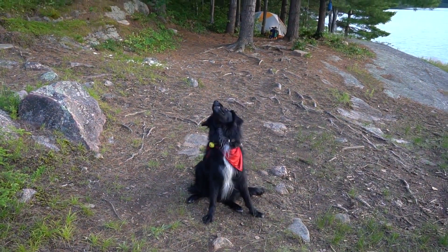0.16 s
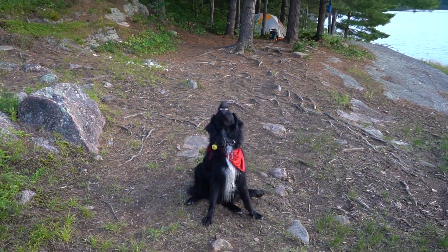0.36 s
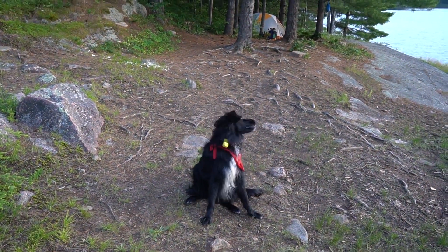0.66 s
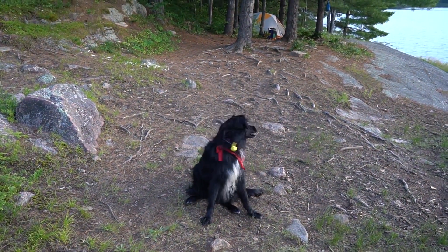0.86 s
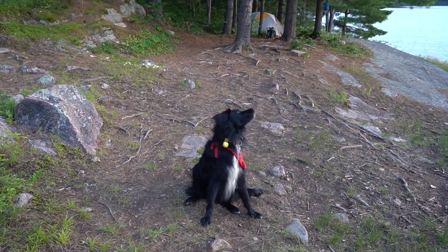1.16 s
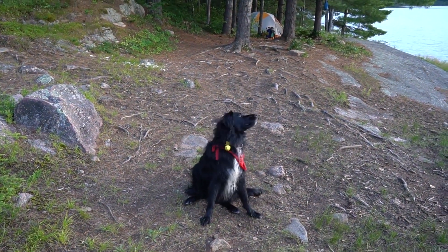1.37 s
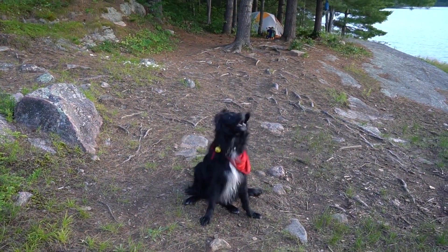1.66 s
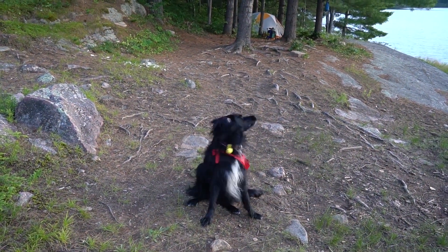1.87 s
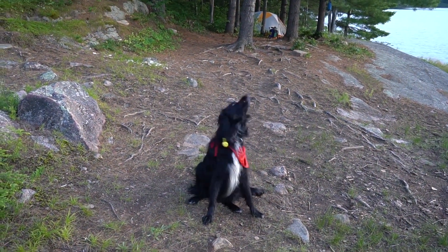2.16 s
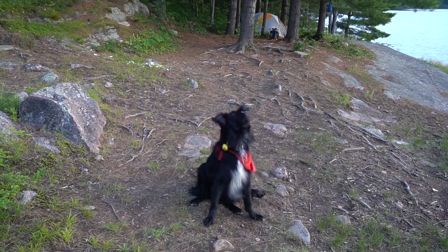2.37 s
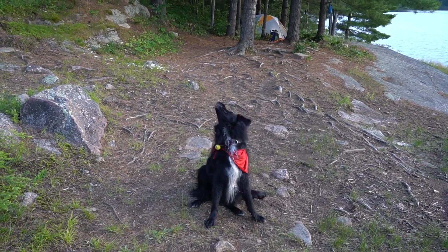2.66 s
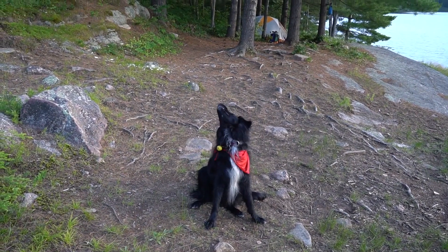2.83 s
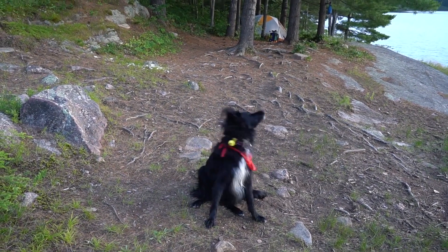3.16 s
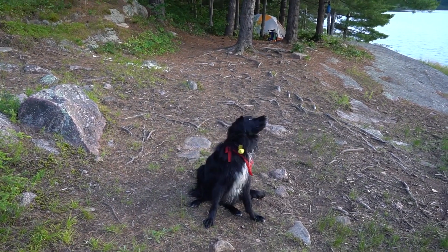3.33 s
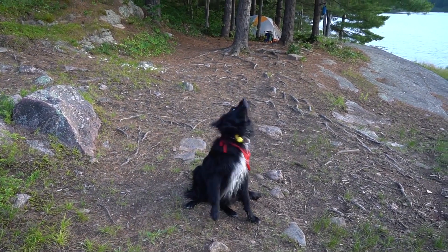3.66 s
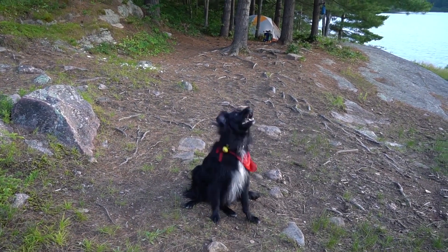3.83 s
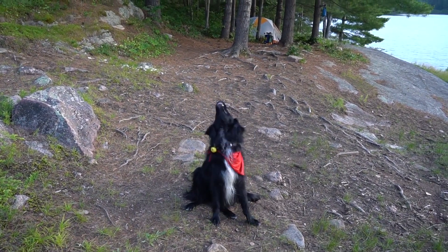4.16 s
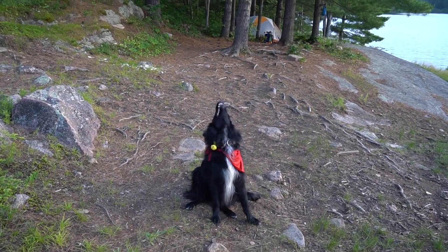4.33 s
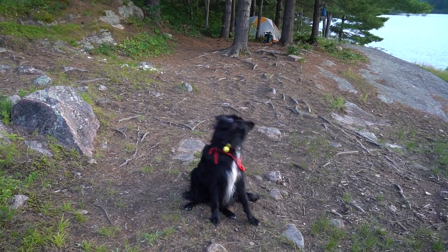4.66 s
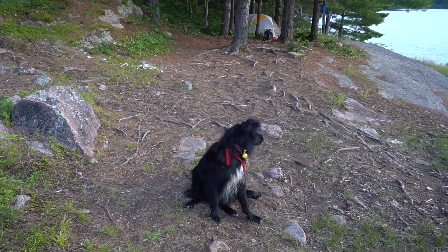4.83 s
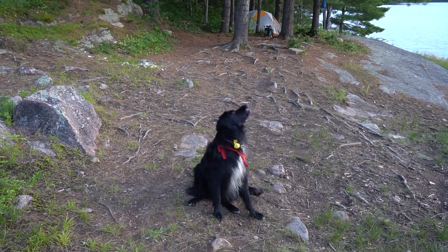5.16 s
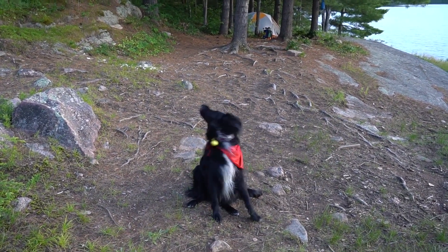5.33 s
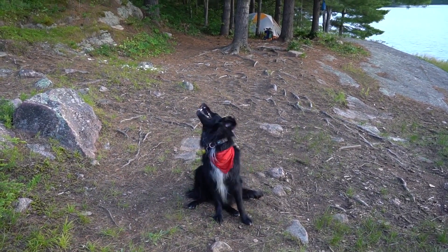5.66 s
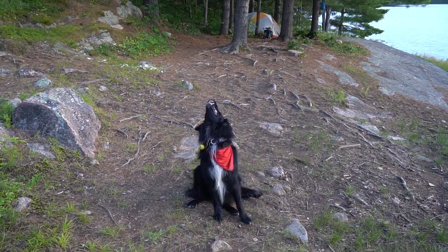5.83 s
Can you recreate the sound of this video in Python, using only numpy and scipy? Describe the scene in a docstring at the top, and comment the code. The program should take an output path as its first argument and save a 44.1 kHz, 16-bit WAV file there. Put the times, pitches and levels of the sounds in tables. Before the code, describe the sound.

Outdoors among trees by water, a dog tosses its head and its collar bell tinkles sharply, each toss a quick clatter of tiny metallic hits that die almost at once. Brief gaps leave only faint air and low rumble. A clear snap of teeth with a dull thud comes before the strongest rings; later jingles are more scattered, ending in a fresh flurry. Nearby dry stereo microphones, slight woodland tail.

```python
"""A small metal jingle bell on a dog's collar, close to a stereo pair of microphones at a lakeside campsite.
The dog tosses its head, snapping at the air: each toss sets a loose pellet tumbling in the bell, and square
hits stand out. Each contact rings decaying sine modes of shell and cavity, with a short noise skid.
Around it: jaw snaps (clicks, mouth tones, thuds), noise brushes of fur and bandana, gliding sine chips of
a small bird, two thin whistles far off, a scattered tail, and a low noise rumble with a faint breeze."""
import sys
import numpy as np
from scipy import signal
from scipy.fft import rfft, irfft, next_fast_len
from scipy.io import wavfile
from scipy.ndimage import uniform_filter1d, minimum_filter1d, map_coordinates

SR = 44100
rng = np.random.default_rng(int(sys.argv[2]) if len(sys.argv) > 2 else 0)


def store_pcm(level_fs):
    """Save levels as 16-bit WAV."""
    pcm = np.round(np.clip(level_fs, -1, 1) * 32767).astype(np.int16)
    wavfile.write(sys.argv[1], SR, np.atleast_2d(pcm).T)


N = 264159  # length [samples]
TOP_HZ = 15800  # upper band limit
SOUND_SPEED = 343  # m/s

# Levels in the tables are relative: the functions add their own offsets.
# Square hits of the pellet: (time [s], ring [dB], brightness, 11 over 8.5 kHz drive [dB])
STRIKES = [(0.06, -19.5, 2.5), (0.088, -13, 3.5), (0.14, -20.5, -4), (0.228, -27, 0), (0.26, -21, 0),
           (0.481, -42.5, -18.5), (0.572, -27, -0.5), (0.59, -21.5, 4), (0.629, -27.5, 1),
           (0.673, -26.5, 4.5), (0.774, -27.5, 1), (1.098, -26, -5.5), (1.15, -23.5, -2), (1.572, -18, 6.5),
           (1.703, -17.5, -7), (1.823, -18.5, 0), (1.929, -15.5, 2), (2.016, -28.5, -5.5),
           (2.154, -17.5, 0.5), (2.26, -24.5, 5), (2.484, -18.5, -1), (2.527, -10.5, 6), (2.676, -16, 11),
           (2.728, -19, 3), (2.766, -19.5, 1.5), (2.806, -18, 6.5), (2.877, -21, 7.5), (3.202, -23, -2.5),
           (3.471, -13.5, -5.5), (3.529, -23.5, -4.5), (3.964, -23, -6), (3.994, -17.5, -3.5),
           (4.068, -19.5, -3), (4.096, -21.5, -1.5), (4.13, -12.5, 0), (4.191, -24.5, 6.5),
           (4.402, -36, -7), (4.901, -36.5, -4), (5.262, -32, -13.5), (5.536, -23, 7.5), (5.626, -25, 6.5),
           (5.756, -22.5, 9), (5.79, -20.5, 9.5)]
# Head tosses that keep the pellet tumbling: (start [s], end [s], clatter [dB])
TOSSES = [(0.008, 0.141, -41), (0.227, 0.323, -40), (0.571, 0.71, -42.5), (0.878, 0.9, -57.5),
          (1.011, 1.044, -48), (1.217, 1.239, -44.5), (1.375, 1.409, -44.5), (1.496, 1.52, -37.5),
          (1.806, 1.867, -35.5), (1.912, 1.966, -38), (1.994, 2.04, -36.5), (2.121, 2.21, -32.5),
          (2.259, 2.298, -36.5), (2.408, 2.497, -40), (2.518, 2.593, -32.5), (2.874, 2.972, -43.5),
          (3.306, 3.351, -41), (3.386, 3.443, -40), (3.62, 3.681, -44), (3.73, 3.77, -44),
          (3.853, 3.933, -41.5), (3.964, 4.163, -38), (4.244, 4.423, -51), (4.846, 4.942, -47),
          (5.358, 5.413, -53.5), (5.54, 5.659, -40.5), (5.715, 5.855, -38.5)]
# How freely the bell hangs clear of the fur, which mutes its lowest hum: (time [s], hum [dB])
HANGING_FREE = [(0.03, 10.5), (.08, -8), (.27, 9), (.6, -1), (1.17, 3), (1.5, 0), (2.15, 2), (2.4, -4),
                (2.85, 5.5), (3.22, 6), (3.4, -2), (3.95, -0.5), (5.55, -2), (5.64, 15.5), (5.8, 2)]
# Ringing modes of the slotted shell, many in close pairs: (frequency [Hz], level [dB])
SHELL_MODES = [(1671, -12), (1773, -6), (4304, -21), (4435, -14), (4517, -18), (4592, -18), (6944, -12),
               (7789, -4), (7892, -7), (9142, -2), (9755, -14), (11056, -5), (11267, -6), (12011, -1)]
# Decay of the shell before fur mutes it: (frequency [Hz], time to fall 60 dB [s])
SHELL_DECAY = [(1700, 0.22), (4400, 0.17), (8000, 0.12), (12000, 0.089)]
# Nominal resonances of cavity and slot rims, varied at each contact:
# (frequency [Hz], level [dB], time to fall 60 dB [s])
CAVITY_MODES = [(2532, 16, 0.0042), (6975, 6.5, 0.0032), (7020, -8.5, 0.0063), (8950, -4.5, 0.026),
                (10910, -4.5, 0.0076), (14500, -17, 0.011)]
# Spectrum of the pellet skidding on the wall: (frequency [Hz], relative level [dB per Hz])
SKID_SPECTRUM = [(1200, -25.5), (2500, 0.5), (5200, -9), (7500, -7.5), (11500, -18), (13500, -12),
                 (15500, -14)]
# Bell level across the two microphones: (frequency [Hz], left over right [dB])
BELL_BALANCE = [(2500, -1.5), (4450, 2.5), (7800, 2.3), (12000, -1)]
# Bell phase across the two microphones: (frequency [Hz], left lead [rad])
BELL_LEAD = [(1750, 0.029), (2600, -0.32), (4450, 0.67), (7500, -0.73), (9500, -0.13)]
# Jaw snaps: (time [s], level [dB], mouth resonance [Hz], tooth click [dB])
SNAPS = [(1.689, -30.5, 953, -33), (1.696, -27, 723, -34), (2.3027, -15, 480.3, -16.5),
         (3.232, -31.5, 845, -66), (4.784, -35, 1178, -20)]
# Fur and bandana brushes: (time [s], level [dB], width of the Gaussian swell [s])
BRUSHES = [(1.29, -43, 0.0031), (3.817, -35, 0.0063)]
# Bird chips: (time [s], level [dB])
CHIPS = [(1.1, -39), (2.357, -41.5), (3.717, -42), (4.652, -47), (5.758, -39)]
# Nominal pitch within a chip, varied from chip to chip: (time [s], pitch [Hz])
CHIP_GLIDE = [(0, 9700), (.016, 5480), (.027, 3500)]
# Faint far whistles: (time [s], length [s], start pitch [Hz], end pitch [Hz], level [dB])
WHISTLES = [(1.24, .06, 3350, 3250, -54), (5.403, .11, 3030, 2484, -56)]
# Outdoor air over time: (time [s], rumble [dB], breeze [dB])
AIR_LEVELS = [(0, -56, -52.5), (2.25, -56, -52.5), (2.7, -60.5, -58), (3.8, -61, -52.5),
              (4.399, -61, -57.5)]
# Spectrum of the rumble: (frequency [Hz], relative level [dB per Hz])
RUMBLE_SPECTRUM = [(25, -16), (70, 0.5), (130, -2.5), (300, -11.5), (800, -48)]
# Spectrum of the breeze: (frequency [Hz], relative level [dB per Hz])
BREEZE_SPECTRUM = [(150, -8), (450, -3.5), (1200, -7.5), (2500, -13), (5000, -19.5), (12000, -21.5),
                   (15500, -36)]
# Likeness of the two microphones in noise: (frequency [Hz], correlation [0 to 1])
STEREO_LIKENESS = [(60, 0.97), (160, 0.76), (600, 0.14), (5000, 0.57)]
# Tail scattered by rocks and trunks: (frequency [Hz], time to fall 60 dB [s])
WOODS_DECAY = [(1000, 0.73), (12000, 0.22)]


def bell(hum_db=-3.0, middle_db=-1, ring_db=1.66, shift_hz=135, mute_db_per_s=30, flutter_db=1.33,
         damping_spread=0.56):
    """Every contact rings the shell and the cavity; the pellet's place retunes and damps the cavity."""
    t = np.arange(SR // 4) / SR
    cavity_t = t[:len(t) // 10]
    shell_hz, shell_db = np.transpose(SHELL_MODES)
    shell_rings = ringing(shell_hz, along(SHELL_DECAY, shell_hz), t)
    high = shell_hz > 6000
    cavity_hz, cavity_db, cavity_t60 = np.transpose(CAVITY_MODES)
    shell, cavity = np.zeros((2, N)), np.zeros(N)  # shell rows: low modes, high modes
    contacts = [*strikes(), *tumbling()]
    for s, ring, bright, clack in contacts:
        hum = (clack + ring) / 2 + hum_db + np.interp(s, *np.transpose(HANGING_FREE))
        # a soft, dull contact favours the middle modes, a hard one the highest
        dull, sharp = ring - bright / 2, ring + bright / 2
        blow = [(1800, hum), (2500, clack), (4200, dull + middle_db), (8500, dull), (11000, sharp)]
        shift, damping = rng.standard_normal((2, len(CAVITY_MODES)))
        retuned_hz = cavity_hz + shift_hz * shift
        damped_t60 = cavity_t60 * np.exp(damping_spread * damping)
        cavity_rings = ringing(retuned_hz, damped_t60, cavity_t)
        # fur touching the shell cuts some rings shorter than others
        muted = amp(-mute_db_per_s * rng.exponential() * t)
        strengths = struck(shell_db + along(blow, shell_hz))
        add(shell, s, (strengths * [~high, high]) @ shell_rings * muted)
        add(cavity, s, struck(cavity_db + along(blow, cavity_hz)) @ cavity_rings)
    # the pellet grazing the wall makes the high modes flutter, while the low ones ring on smoothly
    flutter = amp(flutter_db * wobble(600))
    return amp(ring_db) * (shell[0] + flutter * shell[1]) + cavity + skids(contacts)


def strikes(clack_db=-38, clack_grows=.38, typical_db=-22, hop_s=.012, hop_ring_db=-13, hop_clack_db=-2,
            loss_db=4, count=4):
    """A square hit rings and clacks more the harder it is; the pellet then hops, on average ever more lightly."""
    s, ring, bright = np.transpose(STRIKES)
    clack = clack_db + clack_grows * (ring - typical_db)
    contacts = list(zip(s, ring, bright, clack))
    for hop in range(count):
        late, force = rng.standard_normal((len(s), 2)).T
        s = s + hop_s * np.exp(.4 * late)
        db = 2.2 * force - loss_db * hop
        contacts += zip(s, ring + hop_ring_db + db, bright, clack + hop_clack_db + db)
    return contacts


def tumbling(gap_s=.0095, uneven=.6, scatter_db=4.0, fade_db_per_s=20,
             settle_s=.06, settle_db=-9, settle_db_per_s=170,
             clack_db=3, ring_db=-1.0, bright_db=-3, ring_grows=0.27, typical_db=-42,
             first_clack_db=6, first_ring_db=-36, first_grows=0.73, first_bright_db=-4):
    """A toss throws the pellet on the wall with a soft chink; uneven small contacts follow, then it settles."""
    contacts = []
    for start, end, db in TOSSES:
        gaps = gap_s * np.exp(uneven * rng.uniform(-2, 1, size=100))
        times = start + np.cumsum(gaps)
        scatter = scatter_db * np.clip(rng.standard_normal(len(times)), -2, 2)
        force = scatter - fade_db_per_s * (times - start)
        during = times <= max(end, times[0])
        settling = np.where(during, 0, settle_db - settle_db_per_s * (times - end))
        mean_force_db = 10 * np.log10(np.mean(amp(force[during]) ** 2))
        levels = db + force - mean_force_db + settling
        livelier = db - typical_db
        first_ring = first_ring_db + first_grows * livelier
        contacts.append((start, first_ring, first_bright_db, db + first_clack_db))
        # a gentle toss mostly clacks, a lively one also rings
        ring = ring_db + ring_grows * livelier
        for s, level in zip(times, levels):
            if s < end + settle_s:
                contacts.append((s, level + ring, bright_db, level + clack_db))
    return contacts


def struck(db, spot_db=5):
    """Mode strengths for one contact: the spot it meets shares out its energy among them."""
    sign = rng.choice([-1, 1], len(db))
    spot = sign * amp(spot_db * rng.standard_normal(len(db)))
    mean_power = np.average(spot ** 2, weights=amp(db) ** 2)
    return spot * amp(db) / np.sqrt(mean_power)


def ringing(hz, t60, t, contact=.0004):
    """One fading sine per mode; the pellet's contact time [s] softens the onset."""
    sines = np.sin(2 * np.pi * hz[:, None] * t)
    return sines * amp(-60 * t / t60[:, None]) * (1 - np.exp(-t / contact))


def skids(contacts, skid_db=-6, ring_share=0.23, skid_t60=0.032):
    """At each contact the pellet scrapes briefly along the wall: noise bursts that add in power."""
    t = np.arange(SR // 20) / SR
    power = np.zeros(N)
    for s, ring, bright, clack in contacts:
        level = skid_db + clack + ring_share * (ring - clack)
        add(power, s, amp(level - 60 * t / skid_t60) ** 2)
    scrape = filtered(rng.standard_normal(N), lambda hz: amp(along(SKID_SPECTRUM, hz)))
    return np.sqrt(power) * unit(scrape)


def swinging(x, sway_m=.018, sway_rate=13, turn_m=.0007, beam_db=.7):
    """The bell swings on the collar: Doppler bends its pitch; path and level differ a little per microphone."""
    path = sway_m * wobble(sway_rate)
    channels = []
    for delay in [(path + turn_m * wobble(28)) * SR / SOUND_SPEED for _ in range(2)]:
        moved = map_coordinates(x, [np.arange(N) - delay], order=5)
        channels.append(moved * amp(beam_db * wobble(7.45)))
    return np.array(channels)


def placed(pair):
    """Each partial of the bell reaches the two microphones with its own level and phase."""
    half = np.array([[.5], [-.5]])  # left, right

    def response(hz):
        return amp(half * along(BELL_BALANCE, hz)) * np.exp(1j * half * along(BELL_LEAD, hz))

    return filtered(pair, response)


def jaws(swell=0.0019, click_t60=0.0046, wet_db=-10, body_db=-15, body_hz=240, body_t60=0.056):
    """Each snap is a click of teeth, a few cycles of the closing mouth and a dull thud of the muzzle."""
    t = np.arange(SR // 20) / SR
    rise = (t / swell * np.exp(1 - t / swell)) ** 2  # peaks at the swell time [s], then fades
    thud = amp(body_db - 60 * t / body_t60) * np.cos(2 * np.pi * body_hz * t) * (1 - np.exp(-t / swell))
    out = np.zeros(N)
    for s, db, hz, click_db in SNAPS:
        # wet smack: noise through one broad low resonance
        smack = unit(signal.lfilter([1, -1], [1, -1.8, .82], rng.standard_normal(len(t))))
        mouth = rise * (np.sin(2 * np.pi * hz * t) + amp(wet_db) * smack)
        add(out, s, amp(db) * (mouth + thud))
        add(out, s, amp(click_db - 60 * t / click_t60) * rng.standard_normal(len(t)))
    return out


def fur():
    """Short soft brushes as the neck turns: noise under Gaussian swells."""
    t = np.arange(N) / SR
    strokes = sum(amp(db) * np.exp(-((t - s) / width) ** 2) for s, db, width in BRUSHES)
    return strokes * rush([(300, 6.0), (2500, 17.5), (6000, 7), (14000, -28)])  # (Hz, dB per Hz)


def bird(length=0.029):
    """Each chip is one thin whistle that plunges in pitch."""
    t = np.arange(round(length * SR)) / SR
    pitch = np.interp(t, *np.transpose(CHIP_GLIDE))
    out = np.zeros(N)
    for s, db in CHIPS:
        varied = pitch * (1 + rng.normal(0, 0.0324))
        phase = 2 * np.pi * np.cumsum(varied) / SR
        add(out, s, amp(db) * np.sin(np.pi * t / length) * np.sin(phase))
    return out


def whistles():
    """Each far whistle swells and fades while its pitch sinks."""
    out = np.zeros(N)
    for s, length, start_hz, end_hz, db in WHISTLES:
        pitch = np.linspace(start_hz, end_hz, round(length * SR))
        tone = np.sin(2 * np.pi * np.cumsum(pitch) / SR)
        add(out, s, amp(db) * np.hanning(len(pitch)) * tone)
    return out


def woods(x):
    """Rocks and trunks scatter back a thin tail, treble dying first: convolution with fading noise."""
    hz, t, noise = signal.stft(rng.standard_normal((2, SR // 2)), SR, nperseg=256)
    fade = amp(-60 * t / along(WOODS_DECAY, hz)[:, None])
    tail = signal.istft(noise * fade, SR, nperseg=256)[1]
    tail = tail / np.linalg.norm(tail[0])
    return signal.fftconvolve(x[None], tail, axes=1)[:, :N]


def air(rumble_db=2, breeze_db=4):
    """A low rumble and a faint breeze in the trees: shaped noise, each wavering a little."""
    t = np.arange(N) / SR
    s, low, high = np.transpose(AIR_LEVELS)
    rumble_level = np.interp(t, s, low) + rumble_db + wobble(7)
    breeze_level = np.interp(t, s, high) + breeze_db + wobble(5)
    return amp(rumble_level) * rush(RUMBLE_SPECTRUM) + amp(breeze_level) * rush(BREEZE_SPECTRUM)


def rush(spectrum):
    """Stereo noise of rms 1, nearly mono in the bass: mid and side shares set the likeness."""
    def mid_side(hz):
        turn = np.arccos(np.clip(along(STEREO_LIKENESS, hz), -1, 1)) / 2
        return amp(along(spectrum, hz)) * [np.cos(turn), np.sin(turn)]

    mid, side = filtered(rng.standard_normal((2, N)), mid_side)
    return unit(np.array([mid + side, mid - side]))


def amp(db):
    """Decibels to gain."""
    return 10 ** (np.asarray(db) / 20)


def unit(x):
    """Scale to rms 1."""
    return x / np.sqrt(np.mean(x ** 2) + 1e-20)


def along(points, hz):
    """Read (frequency [Hz], value) points on a log frequency axis."""
    f, v = np.transpose(points)
    return np.interp(np.log(hz + 1), np.log(f + 1), v)


def wobble(rate):
    """A smooth random curve, rate knots a second."""
    knots = rng.standard_normal(int(N * rate / SR) + 4)
    return map_coordinates(knots, [np.arange(N) * rate / SR])


def filtered(x, response):
    """Multiply the spectrum of x by a response of frequency [Hz]."""
    m = next_fast_len(N + SR // 2)
    return irfft(rfft(x, m) * response(np.fft.rfftfreq(m, 1 / SR)), m)[..., :N]


def add(track, s, sound):
    """Mix a sound into a track at time s [s]."""
    part = track[..., max(0, round(s * SR)):][..., :sound.shape[-1]]
    part += sound[..., :part.shape[-1]]


def scene(bell_echo_db=-16, body_echo_db=-20, bird_echo_db=-2):
    """The dog is close and fairly dry; the bird is farther off among the trees."""
    jingle = placed(swinging(bell()))
    body = jaws() + fur()
    chips = bird()
    scattered = amp(bell_echo_db) * jingle.mean(axis=0)
    scattered = scattered + amp(body_echo_db) * body.mean(axis=0) + amp(bird_echo_db) * chips
    return jingle + body + chips + whistles() + woods(scattered) + air()


def record(dry):
    """A limiter turns down the sharpest peaks in both channels alike; a band limit then cuts the top."""
    ceiling, hold = .9, SR // 250  # full scale = 1; samples
    needed = ceiling / np.maximum(abs(dry).max(axis=0), ceiling)
    gain = uniform_filter1d(minimum_filter1d(needed, 2 * hold), hold)
    return filtered(dry * gain, lambda hz: hz < TOP_HZ)


dry = scene()
out = record(dry)
store_pcm(out)
```